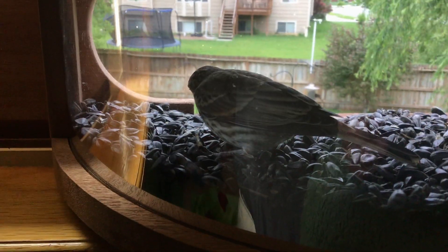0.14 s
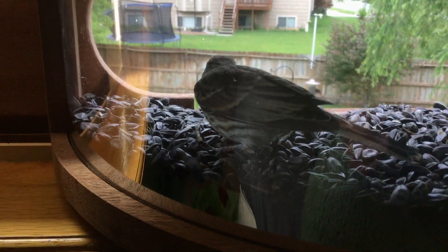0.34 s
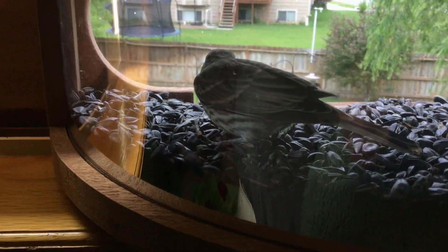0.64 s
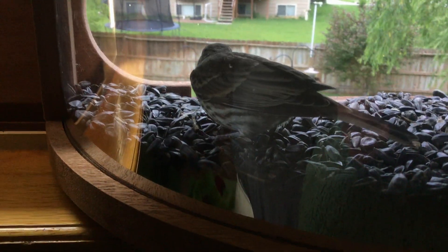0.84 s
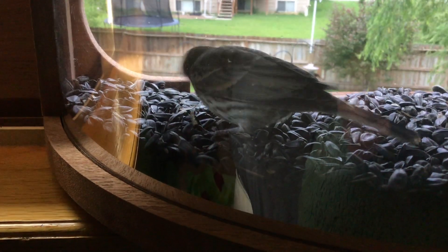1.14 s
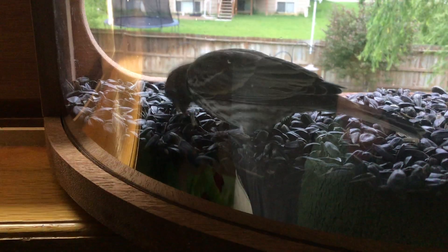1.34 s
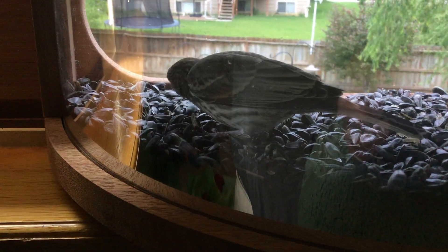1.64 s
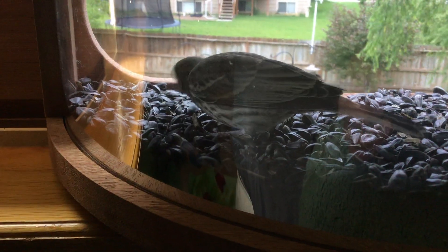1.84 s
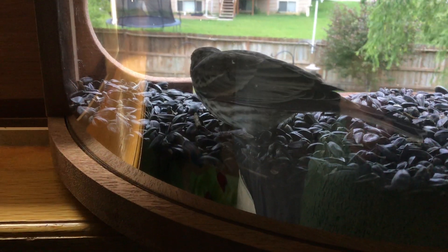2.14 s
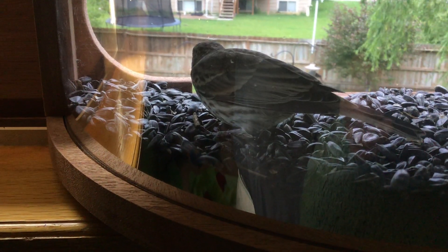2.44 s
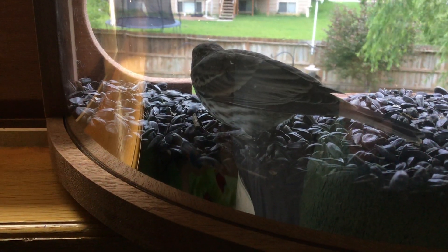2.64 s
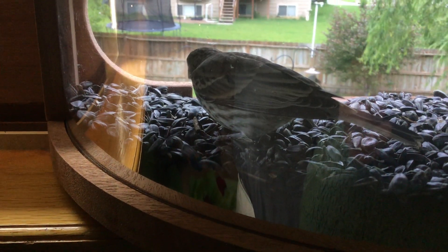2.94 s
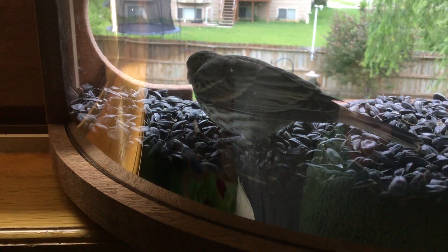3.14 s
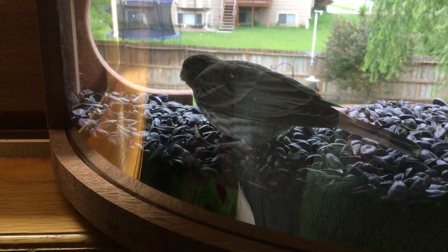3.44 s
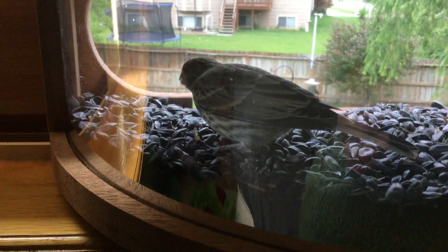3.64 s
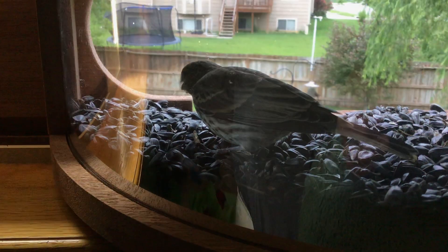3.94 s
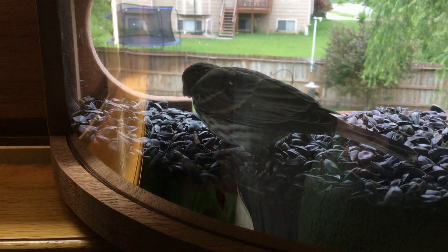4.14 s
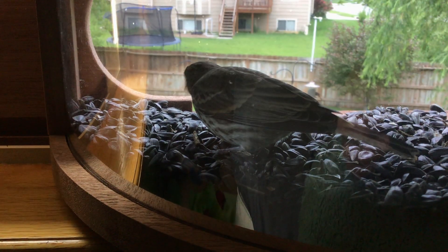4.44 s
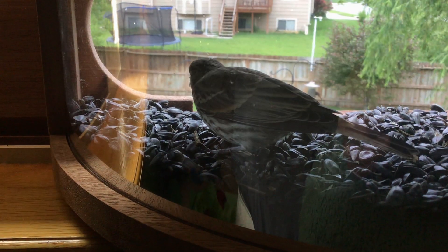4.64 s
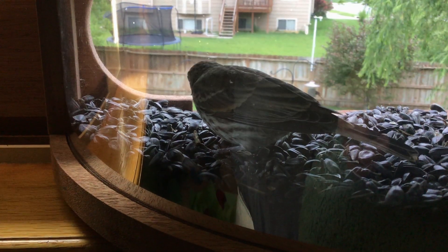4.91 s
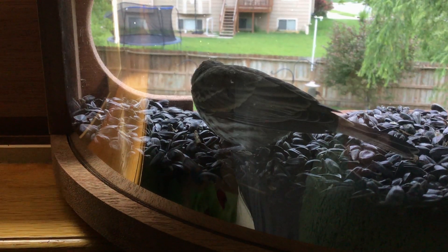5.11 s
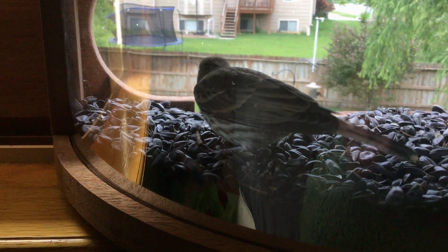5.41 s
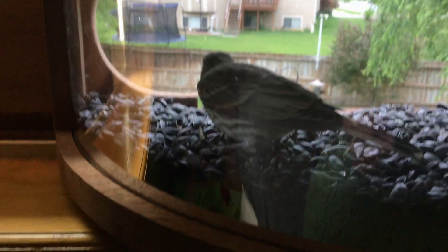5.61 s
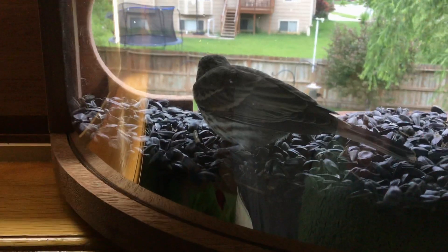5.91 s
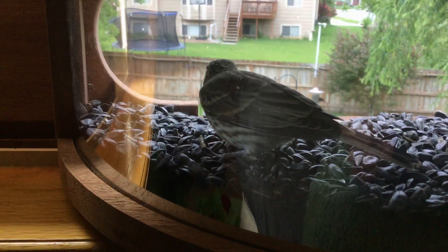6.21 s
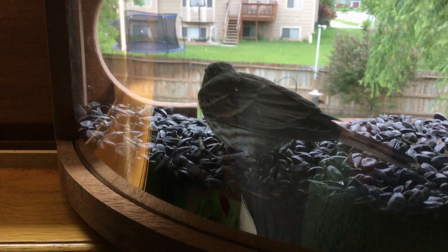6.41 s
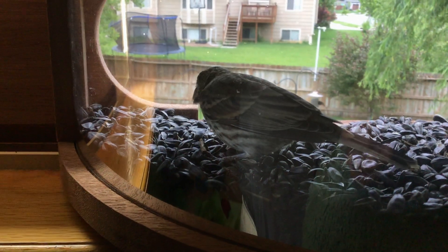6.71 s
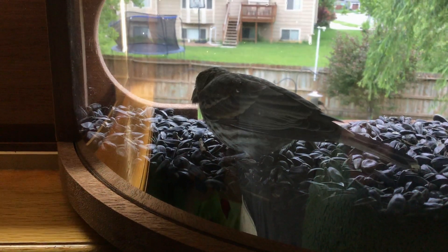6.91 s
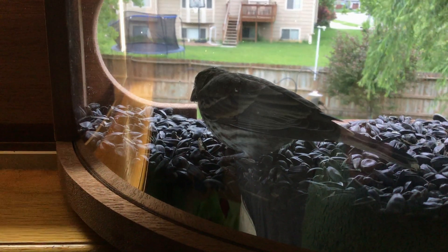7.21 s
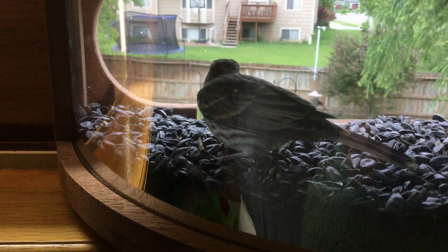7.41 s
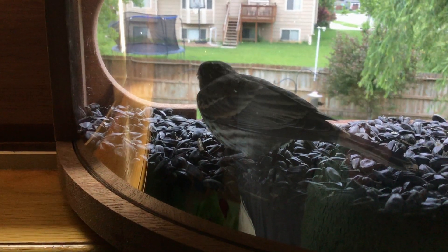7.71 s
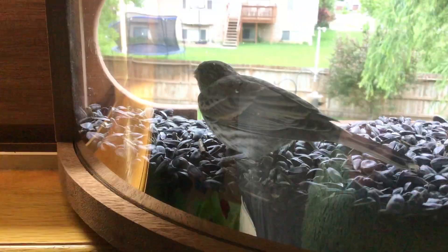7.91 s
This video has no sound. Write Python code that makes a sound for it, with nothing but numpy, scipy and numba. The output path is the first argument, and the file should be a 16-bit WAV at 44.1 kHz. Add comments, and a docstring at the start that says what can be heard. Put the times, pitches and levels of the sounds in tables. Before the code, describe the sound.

Indoors, close to a window seed tray, a low house hum wavers under faint hiss. A small bird makes tiny husk clicks and soft taps, then a strong hollow knock just before four seconds. Its feet scrape through seeds around five and a half seconds, followed by two more clear pecks.

```python
"""Bird at a window tray

A small bird feeds in a seed tray fixed to a window, heard from indoors right at the pane.
Knocks are single pulses sent through tray and pane, treble first and bass last, like falling chirps;
a short burst of noise ticks follows each. Feet shuffle through the seeds as swells of dense ticks.
A far bird is two thin gliding tones, and a faint buzz of evenly spaced noise puffs comes and goes.
Beneath lie the hum of the house, noise shaped by room resonances, and the microphone's steady hiss."""
import sys
import numpy as np
from scipy import signal
from scipy.fft import rfft, irfft, next_fast_len
from scipy.io import wavfile
from scipy.ndimage import uniform_filter1d
from numba import njit

SR = 44100
rng = np.random.default_rng(int(sys.argv[2]) if len(sys.argv) > 2 else 0)


def generate_wav(sig):
    """Save sig (samples, or channels by samples) to the path in sys.argv[1] as 16-bit PCM at SR."""
    pcm = np.round(np.clip(np.atleast_2d(sig).T, -1, 1) * 32767).astype(np.int16)
    wavfile.write(sys.argv[1], SR, pcm)


N = 355225
SIZE = next_fast_len(N + SR)  # room after the end, so filter tails do not wrap round
HZ = np.arange(SIZE // 2 + 1) * SR / SIZE + 1e-3  # never quite 0, so it can be divided by
TIME = np.arange(N) / SR


def undb(db):
    """Gain of a level in dB."""
    return 10 ** (np.asarray(db) / 20)


def unit(x):
    """Scaled to rms 1."""
    return x / np.sqrt(np.mean(x ** 2))


def colour(table):
    """Gain at every frequency, drawn through (frequency [Hz], gain [dB]) points."""
    hz, db = np.transpose(table)
    return undb(np.interp(np.log(HZ), np.log(hz), db))


def shape(x, gain):
    """Filter by a frequency response."""
    return irfft(rfft(x, SIZE) * gain, SIZE)[:N]


def above(hz):
    """Share of each frequency that lies above a soft edge."""
    return 1 / (1 + (hz / HZ) ** 4)


def walk(rate):
    """Wandering random values: each held 1 / rate seconds, then smoothed twice; spread near 1."""
    hold_samples = int(SR / rate)
    steps = np.repeat(rng.standard_normal(N // hold_samples + 1), hold_samples)
    smooth = uniform_filter1d(uniform_filter1d(steps, hold_samples), hold_samples)
    return 2.5 * smooth[:N]


def bump(s, length):
    """A smooth rise and fall of height 1 around a moment."""
    return np.clip(1 - (2 * (TIME - s) / length) ** 2, 0, 1) ** 2


def peaks(modes):
    """Gain at every frequency from resonances whose dB boosts add up."""
    return undb(sum(db / (1 + (2 * (HZ - hz) / width) ** 2) for hz, width, db in modes))


def swells_db(table):
    """Extra dB over time from a list of swells."""
    return sum(up_db * bump(s, length) for s, length, up_db in table)


# tone of the house hum: (frequency [Hz], gain [dB])
HUM_COLOUR = [(15, -71), (29, -48), (51, -11), (101, -2.5), (129, -14.5), (157, -10.5), (220, -17),
              (256, -17.5), (293, -23.5), (427, -25), (650, -36), (711, -33), (5000, -53.5), (6500, -79.5),
              (11000, -120)]
# room resonances that gather the hum: (frequency [Hz], width [Hz], boost [dB])
ROOM_MODES = [(65.7, 15, 8), (108, 34, 6), (154.7, 5, 8), (193.2, 11, 6.5), (265.3, 12, 5.5),
              (338, 35, 1.5), (377, 18, -0.5), (451, 16, 5), (516, 41, 5), (766, 41.8, 4), (1300, 44, 3.5)]
# loudness of the hum: (time [s], level [dB])
HUM_LEVEL = [(0, -50.5), (.4, -53.5), (1.1, -52.5), (1.55, -56.5), (2.0, -54), (2.3, -54), (2.6, -54),
             (3.5, -55), (3.95, -60.5), (4.25, -56), (4.65, -53), (5.3, -52.5), (5.85, -59.5), (6.3, -54.5),
             (6.7, -50), (7.05, -53.5), (7.45, -47.5), (7.75, -55.5), (8.05, -50)]
# swells of the deepest band: (middle time [s], length [s], rise [dB])
DEEP_SWELLS = [(1.617, 0.69, 12.5), (2.847, 0.68, 8), (5.624, 0.28, 14.5)]
# swells of the drone near 155 Hz: (middle time [s], length [s], rise [dB])
DRONE_SWELLS = [(2.1, 1.6, 8.1), (3.35, 0.72, 7.1), (4.5, 0.51, 6.2), (5.9, 0.3, 12), (7.25, 1.6, 3.4)]
DEEP_DB, DRONE_DB = -7, -13  # bands around 67 and 155 Hz, relative to the hum, before their swells
UPPER_HUM_DB = -72  # everything above about 300 Hz
# a thin tone inside the drone band; its level is relative to that band
DRONE_HZ, DRONE_LINE_DB, DRONE_WANDER_HZ = 156.3, -4, 1.8


def hum():
    """House rumble gathered in room resonances; bands flicker separately, the upper ones have no swells."""
    gain = colour(HUM_COLOUR) * (1 - above(4000)) * peaks(ROOM_MODES)
    edges = [above(hz) ** 2 for hz in (1, 82, 135, 180, 300, 600, 1200)] + [0]
    bands = []
    for lower, upper in zip(edges, edges[1:]):
        band = shape(rng.standard_normal(N), gain * np.sqrt(lower - upper))
        flicker_db = 0.38 * walk(rate=9.1) + 0.73 * walk(rate=11)
        bands.append(undb(flicker_db) * band)

    hum_db = np.interp(TIME, *np.transpose(HUM_LEVEL))
    deep_db = hum_db + DEEP_DB + swells_db(DEEP_SWELLS)
    drone_db = hum_db + DRONE_DB + swells_db(DRONE_SWELLS)

    line_hz = DRONE_HZ + DRONE_WANDER_HZ * walk(rate=3)
    line = undb(DRONE_LINE_DB) * unit(np.sin(2 * np.pi * np.cumsum(line_hz) / SR))

    deep = undb(deep_db) * unit(bands[0])
    middle = undb(hum_db) * unit(bands[1] + bands[3])
    drone = undb(drone_db) * (unit(bands[2]) + line)
    upper_hum = undb(UPPER_HUM_DB) * unit(sum(bands[4:]))
    return deep + middle + drone + upper_hum


# resonances that colour the buzz: (frequency [Hz], width [Hz], gain [dB])
BUZZ_MODES = [(3440, 1600, -11), (2270, 225, -18)]
BUZZ_RATE_HZ = 60
BUZZ_FROM_S, BUZZ_TO_S, BUZZ_DB, BUZZ_FADE_DB_PER_S = 6.45, 7.62, -82, 155


def buzz():
    """A faint thin buzz: evenly spaced noise puffs of uneven size in high resonances."""
    cycle = TIME * BUZZ_RATE_HZ
    puff_sizes = undb(1.5 * rng.standard_normal(int(cycle[-1]) + 1))
    size = puff_sizes[cycle.astype(int)]
    puffs = size * np.exp(-(cycle % 1) / 0.59) * rng.standard_normal(N)  # each puff dies away
    ring = sum(undb(db) / (1 + (2 * (HZ - hz) / width) ** 2) for hz, width, db in BUZZ_MODES)
    # how far each moment lies outside the buzzing stretch
    outside_s = np.maximum(0, np.maximum(BUZZ_FROM_S - TIME, TIME - BUZZ_TO_S))
    return unit(shape(puffs, ring)) * undb(BUZZ_DB - BUZZ_FADE_DB_PER_S * outside_s)


# calls of the far bird: (start time [s], length [s], from [Hz], to [Hz], peak level [dB])
CHIRPS = [(4.515, 0.067, 2130, 2320, -79), (4.592, 0.027, 2260, 2280, -81)]


def chirps():
    """Thin whistles of a bird far outside: pure tones that glide, rise and fade."""
    out = np.zeros(N)
    for s, length, from_hz, to_hz, db in CHIRPS:
        count = int(length * SR)
        pitch_hz = np.linspace(from_hz, to_hz, count)
        tone = np.sin(2 * np.pi * np.cumsum(pitch_hz) / SR)
        out[int(s * SR):][:count] += undb(db) * np.hanning(count) * tone
    return out


LAG_CYCLES, TURN = 2.15, 0.86  # low pitches arrive about this many cycles late; phase turn [cycles]


def pane():
    """Bending waves in pane and frame run slower the lower they are, so the bass arrives last."""
    # the lag in seconds is about LAG_CYCLES / Hz, and shrinks faster toward the treble
    return np.exp(-2j * np.pi * (LAG_CYCLES * np.log(HZ / (2500 + HZ)) + TURN))


# what the tray rings with: (frequency [Hz], width [Hz], gain [dB])
TRAY_MODES = [(648, 74, 4), (1363, 250, 5.5), (1985, 210, 1.5), (3550, 900, 2), (5000, 500, 6.5),
              (6100, 360, 6)]


def tray():
    """The tray passes the blow and rings on at its own pitches."""
    return 1 + sum((undb(db) - 1) / (1 + 2j * (HZ - hz) / width) for hz, width, db in TRAY_MODES)


def quarters():
    """Thud, body, click and snap shares of the spectrum."""
    return 1 - above(230), above(230) - above(990), above(1100) - above(4500), above(2700)


# tone of the shuffling: (frequency [Hz], gain [dB])
SCRAPE_COLOUR = [(29, -41.5), (50, -33), (76, -8), (188, -5.5), (261, -13), (403, -7), (449, -11),
                 (773, -13.5), (2050, -31), (9000, -47), (11700, -87.5), (19800, -120)]
# feet dragging through the seeds:
# (middle time [s], length [s], body level [dB], thud re body [dB], click re body [dB])
SCRAPES = [(5.488, 0.054, -55.5, 1, -28), (5.524, 0.073, -44.5, -12, -19), (5.554, 0.063, -56, 8, -10.5),
           (5.597, 0.084, -51.5, 5.5, -15), (5.649, 0.078, -52.5, 10.5, -10.5),
           (5.72, 0.25, -70.5, 10, -9.5), (6.091, 0.42, -68, 11, -14.5), (7.745, 0.073, -82, 10.5, 10.5),
           (3.703, 0.21, -67, 2.5, -13.5)]
SCRAPE_SNAP_DB = -9  # snap band relative to click band


def scrapes():
    """Swells of densely ticking seeds, carried by tray and pane like the knocks."""
    ticks = (rng.random(N) < 5000 / SR) * rng.standard_normal(N)  # about 5000 a second
    ticks = ticks * undb(1.1 * rng.exponential(size=N) + 0.95 * walk(rate=150))  # uneven sizes
    path = colour(SCRAPE_COLOUR) * pane() * tray() * (1 - above(5300))
    swells = np.zeros((4, N))  # one row a band
    for s, length, db, thud_db, click_db in SCRAPES:
        bands_db = db + np.array([thud_db, 0, click_db, click_db + SCRAPE_SNAP_DB])
        swells += np.outer(undb(bands_db), bump(s, length))
    out = 0
    for swell, band in zip(swells, quarters()):
        steady_level = np.std(shape(ticks, path * band))
        out = out + shape(swell * ticks, path * band) / steady_level
    return out


# pecks on the tray: (time [s], body level [dB], thud re body [dB], click re body [dB],
# rebound delay [ms], tail re body [dB])
PECKS = [(0.8588, -40, 7.5, -11, 9.5, -13), (1.253, -40, 9, -13, 2.3, -13.5),
         (3.13, -49.5, -0.5, -29, 2.8, -13.5), (3.645, -29.5, 8, -16, 2.2, -25),
         (3.6555, -36.5, 13, -22, 1.77, -29.5), (3.7644, -10, 1, -25, 3.82, -27.5),
         (3.781, -25.5, 3.5, -18.5, 2.2, -36), (5.297, -25.5, -13, -15, 1.17, -23.5),
         (6.385, -20, 4.5, -13, 2.3, -39), (6.427, -42.5, 11, -13.5, 2.15, -27),
         (7.4204, -25.5, 6, -9.5, 2.41, -29), (7.476, -56.5, 26.5, -8, 2.5, -17),
         (7.4795, -56, 17.5, 1, 2.3, -19)]
# dull steps on the tray: (time [s], level [dB])
STEPS = [(.145, -52), (.373, -45.5), (2.625, -46.5), (3.565, -42), (4.584, -45.5), (4.683, -51.5),
         (7.089, -35)]
# husks cracking in the beak: (time [s], level [dB])
HUSKS = [(.107, -66.5), (.547, -64.5), (.746, -64.5), (1.017, -73.5), (1.064, -62), (1.092, -69.5),
         (1.209, -63.5), (1.224, -57.5), (1.979, -63.5), (3.225, -65.5), (5.211, -62)]
SNAP_DB, REBOUND_MS = -4.5, 2.3  # snap of a peck relative to its click; rebound of steps and husks
# thud, body, click, snap; then tail: all relative to the level in the table
STEP_TONE_DB, STEP_TAIL_DB = (1, -24, -44, -51), -50
HUSK_TONE_DB, HUSK_TAIL_DB = (12, -6, 0.5, -19), -15


def blow_rows():
    """Every blow as columns: time [s], thud, body, click, snap, tail [dB], rebound delay [ms]."""
    rows = []
    for s, db, thud_db, click_db, rebound_ms, tail_db in PECKS:
        snap_db = click_db + SNAP_DB
        rows.append((s, db + thud_db, db, db + click_db, db + snap_db, db + tail_db, rebound_ms))
    kinds = (STEPS, STEP_TONE_DB, STEP_TAIL_DB), (HUSKS, HUSK_TONE_DB, HUSK_TAIL_DB)
    for table, tone_db, tail_db in kinds:
        rows += [(s, *np.add(db, tone_db), db + tail_db, REBOUND_MS) for s, db in table]
    return np.transpose(rows)


def tail(at, tail_db):
    """A short burst of dense noise ticks that dies away after each blow."""
    starts = np.zeros(N)
    starts[at] = undb(tail_db)
    t = np.arange(int(0.041 * SR)) / SR
    rise_and_fall = (1 - np.exp(-t / 0.00099)) * np.exp(-t / 0.017) / (1 + (t / 0.024) ** 6)
    swell = signal.fftconvolve(starts, rise_and_fall)[:N]
    ticks = (rng.random(N) < 4500 / SR) * rng.standard_normal(N)  # about 4500 a second
    tone = (above(340) - 0.31 * above(5300)) / (1 + (HZ / 1200) ** 1.91)
    return swell * unit(shape(ticks, tray() * tone))


# tone of the knocks: (frequency [Hz], gain [dB])
KNOCK_COLOUR = [(35, -33.5), (50, -14), (70, 4), (105, 5.5), (170, 5), (235, -3.5), (320, 0), (550, -7),
                (1000, -20.5), (1500, -37.5), (2600, -50), (4500, -61.5), (7000, -93.5), (12000, -100)]
# second blow relative to the first, midway between body and click; further change with each higher band
REBOUND_DB, REBOUND_DULL_DB = -11, -3.5


def knocks():
    """Beak and claws strike the tray and rebound with a softer, duller second blow; a tail follows."""
    s, *bands_db, tail_db, rebound_ms = blow_rows()
    at = (s * SR).astype(int)
    again = ((s + rebound_ms / 1000) * SR).astype(int)
    path = colour(KNOCK_COLOUR) * pane() * tray()
    noise = rng.standard_normal(N)
    out = 0
    for step, (db, band, roughness) in enumerate(zip(bands_db, quarters(), (0, 0, 0.12, 0.1))):
        blows = np.zeros(N)
        blows[at] = undb(db)
        blows[again] += undb(db + REBOUND_DB + REBOUND_DULL_DB * (step - 1.5))
        # each blow carries a few ms of noise, which roughens its treble
        fading = signal.lfilter([1], [1, -np.exp(-1 / (0.0014 * SR))], blows)
        blows += roughness * noise * fading
        peak = np.abs(irfft(path * band, SIZE)).max()  # of one blow of size 1
        out = out + shape(blows, path * band) / peak
    return out + tail(at, tail_db)


def scene():
    """Everything that reaches the microphone."""
    return (hum() + buzz() + chirps() + scrapes() + knocks())[None]


@njit
def hold(x, fall):
    """Jumps up with the input, sinks slowly after it."""
    held, level = np.empty(len(x)), 0.
    for i in range(len(x)):
        level = max(x[i], level * fall)
        held[i] = level
    return held


# tone of the microphone's hiss: (frequency [Hz], gain [dB])
HISS_COLOUR = [(1760, -4), (3000, -1), (3170, -0.5), (4320, -5), (5340, -4), (5800, -7.5), (6560, -5),
               (9060, -4), (10600, -0.5), (11800, -5), (13300, -2.5), (14400, -2.5), (15500, -14.5)]
HISS_DB, TOP_HZ = -79.5, 15630  # hiss level before the top is cut; where that cut begins
# gain control: threshold, dB of cut per dB above it, most cut, delay and release time
DUCK_OVER_DB, DUCK_RATIO, DUCK_MOST_DB, DUCK_LATE_S, DUCK_RELEASE_S = -38, 0.17, 8, 0.066, 0.083


def record(dry):
    """Gain control turns the bass down shortly after loud sounds; then come hiss and a cut of the top."""
    level_db = 10 * np.log10(uniform_filter1d(dry[0] ** 2, int(0.018 * SR)) + 1e-12)
    cut_db = np.clip(DUCK_RATIO * (level_db - DUCK_OVER_DB), 0, DUCK_MOST_DB)
    cut_db = hold(cut_db, np.exp(-1 / (DUCK_RELEASE_S * SR)))
    late = int(DUCK_LATE_S * SR)
    cut_db = np.concatenate([np.zeros(late), cut_db[:-late]])
    cut_db = uniform_filter1d(cut_db, int(0.009 * SR))
    bass = shape(dry[0], 1 - above(350))
    ducked = dry - bass + bass * undb(-cut_db)
    hiss = unit(shape(rng.standard_normal(N), colour(HISS_COLOUR) * above(1500)))
    top_cut = signal.ellip(10, .2, 60, TOP_HZ, fs=SR, output="sos")
    return signal.sosfilt(top_cut, ducked + undb(HISS_DB) * hiss)


dry = scene()
out = record(dry)
generate_wav(out)
```